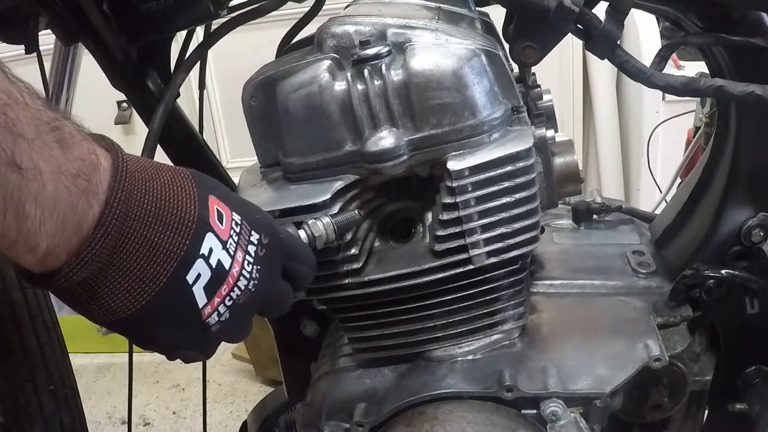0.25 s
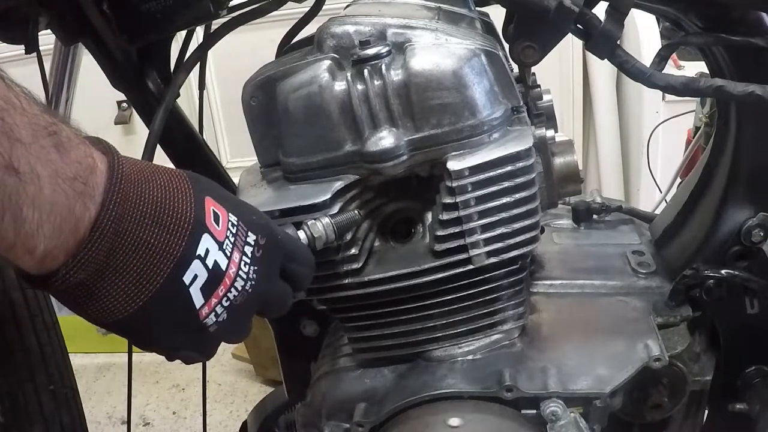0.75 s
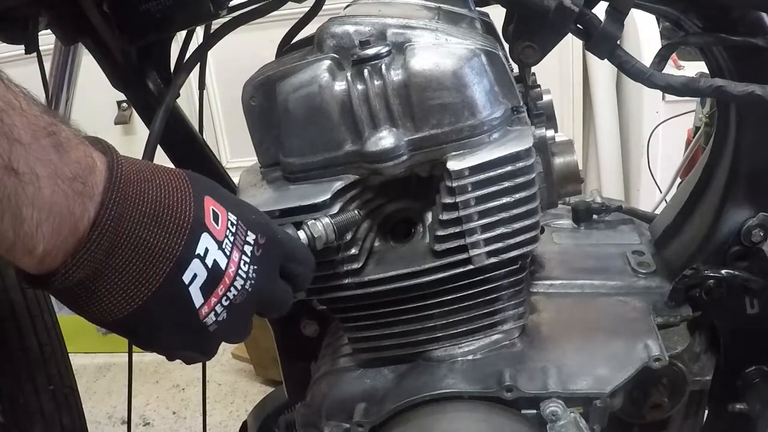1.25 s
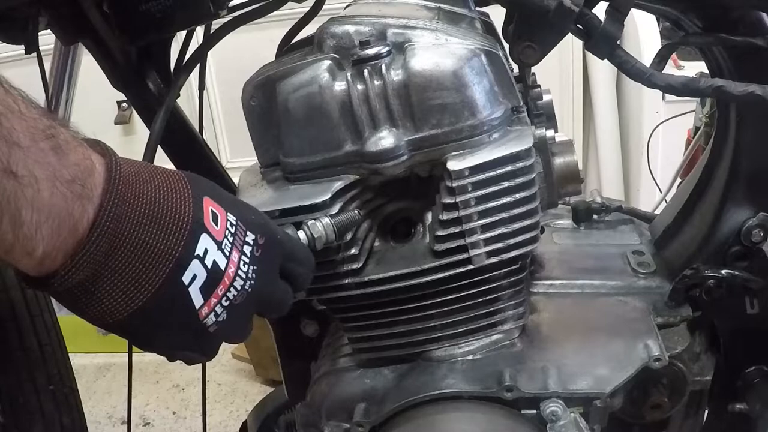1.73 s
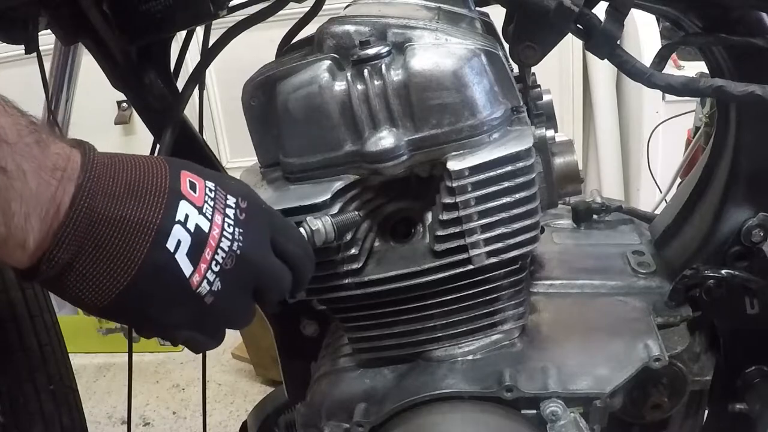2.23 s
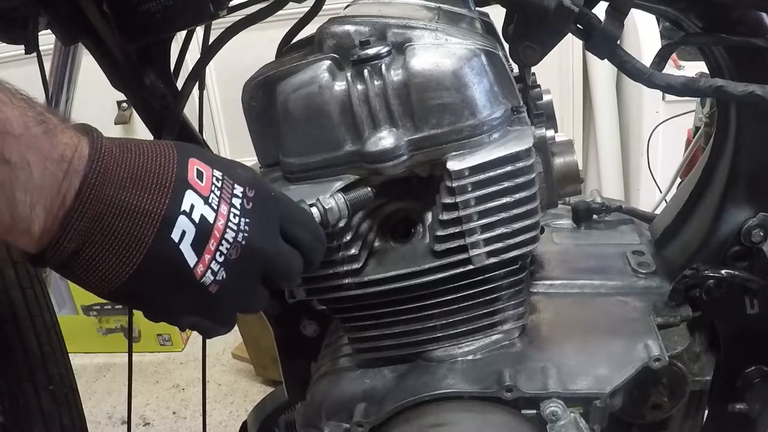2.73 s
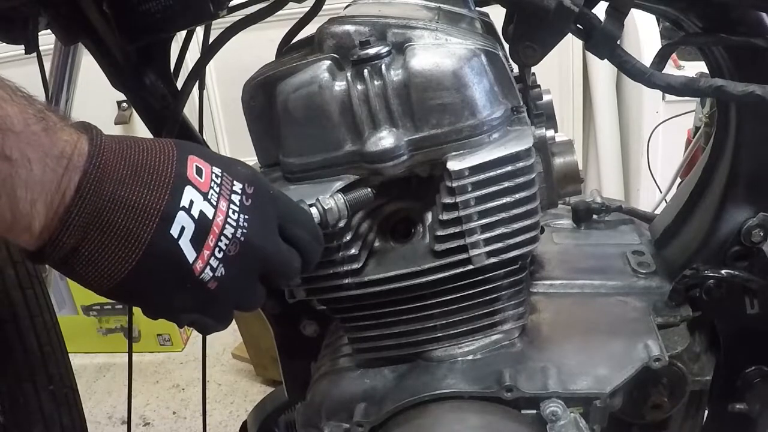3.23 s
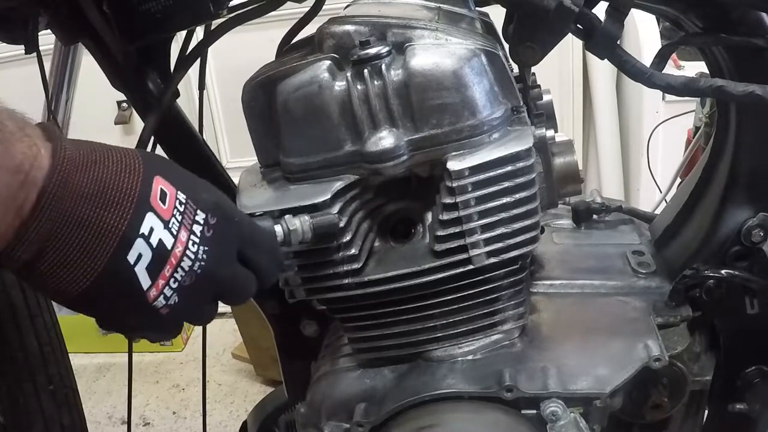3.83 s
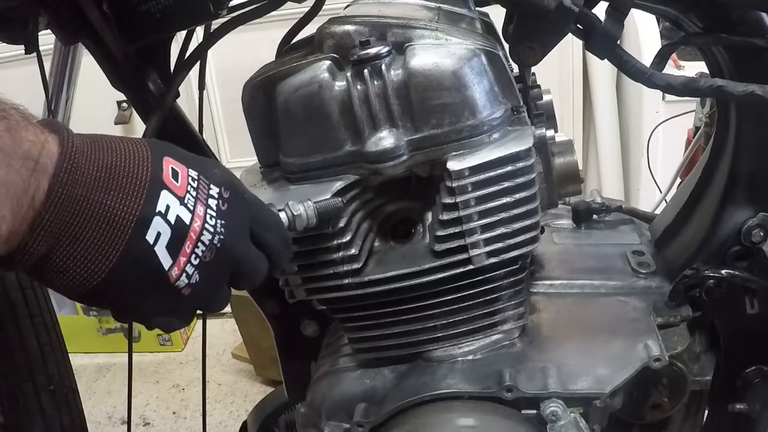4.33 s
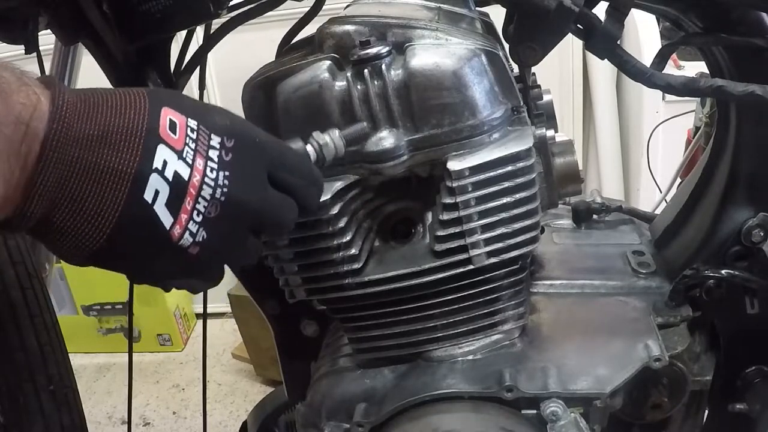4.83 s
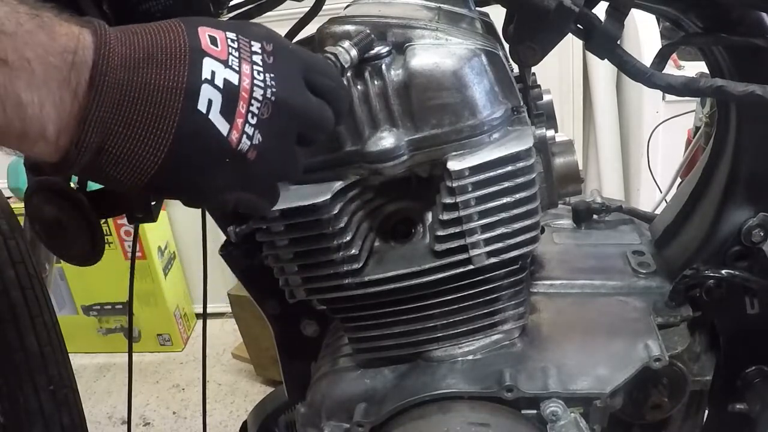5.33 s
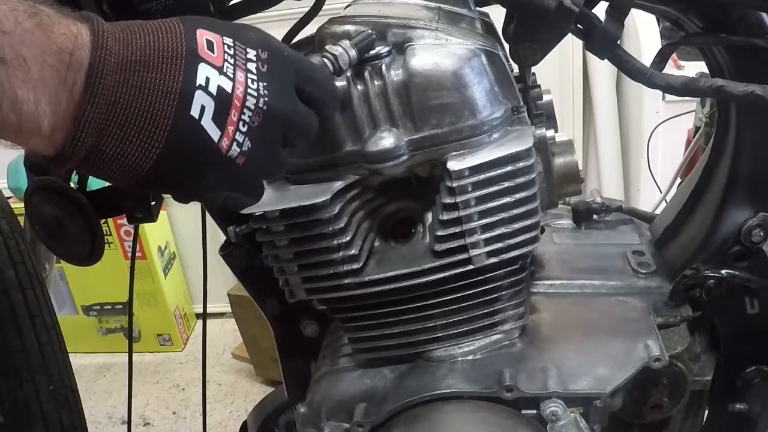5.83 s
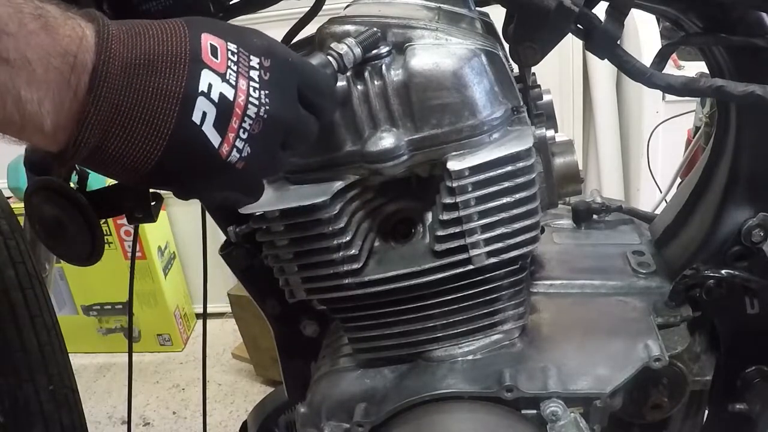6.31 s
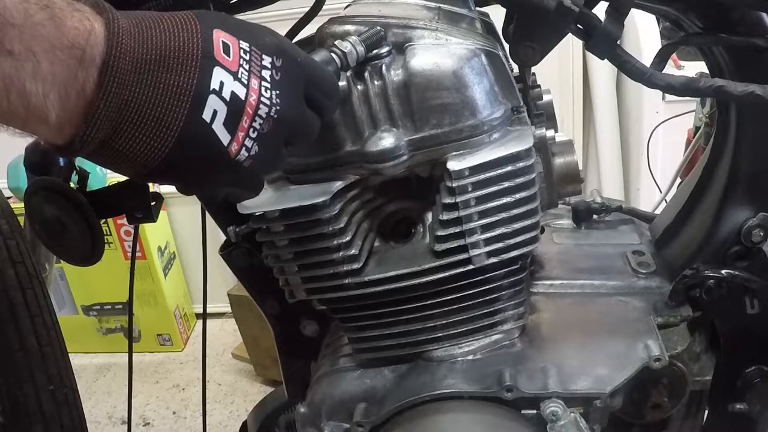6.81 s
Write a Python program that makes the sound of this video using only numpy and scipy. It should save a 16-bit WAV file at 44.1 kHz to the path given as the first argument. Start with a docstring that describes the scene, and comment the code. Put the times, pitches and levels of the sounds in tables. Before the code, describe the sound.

In a garage, a solenoid clacks and an electric starter cranks a twin-cylinder motorcycle engine for about four seconds without firing. The gears whine and grind in pulses, slowing at each piston stroke, over a churning chain and rattling valves. It coasts to rest with a thud, and a plug lead lightly taps the metal. Another clack starts a second try. The sound is close, over a faint low rumble.

```python
"""Over a garage's low rumble a solenoid clacks, and an electric starter cranks a twin-cylinder motorcycle
engine, twice, without firing. The starter gears whine and grind through the cases, slowing at every
piston stroke (one cylinder harder than the other), while the chain churns and the valve train rattles
in the cooling fins. Between the tries the gears thud and coast to rest, and a plug lead taps the head."""
import sys
import numpy as np
from scipy import signal
from scipy.fft import rfft, irfft
from scipy.io import wavfile

SR = 44100
rng = np.random.default_rng(int(sys.argv[2]) if len(sys.argv) > 2 else 0)


def wrap_up_sound(samples):
    """Save the sound to the file named by the first command line argument, as 16-bit audio."""
    columns = np.atleast_2d(samples).T
    # keep every value between -1 and 1, then stretch to whole-number steps
    tamed = np.clip(columns, -1, 1)
    steps = np.round(tamed * 32767).astype(np.int16)
    wavfile.write(sys.argv[1], SR, steps)


N = 311669

# tone of the garage air: (frequency [Hz], level [dB])
AIR_TONE = [(60, -36), (130, -6), (175, -3.5), (245, -7), (370, -14.5), (500, -17.5), (1460, -27.5),
            (3400, -40.5), (4700, -29), (5700, -32.5), (7300, -44), (9700, -36.5), (12000, -51),
            (15500, -54)]
# tone of the low rumble: (frequency [Hz], level [dB])
RUMBLE_TONE = [(12, -1), (28, -0.5), (45, -0.5), (80, -4), (120, -10), (200, -36), (500, -58)]
# fader ride on the rumble: (time [s], level [dB])
RUMBLE_FADER = [(0.0, -39), (1.01, -42.5), (5.07, -39.5), (6.87, -57.5), (6.95, -66)]

# the hand-held plug lead touches the head: (time [s], relative level [dB])
LEAD_HITS = [(5.18, -28.5), (5.2435, -34)]
# tone of a tap: (frequency [Hz], level [dB])
LEAD_TONE = [(600, -5), (2000, -3), (2700, -1), (3600, 0), (4400, 10), (5700, -6), (7000, -21),
             (14000, -26)]
# the solenoid plunger snaps in and seats: (time [s], relative level [dB])
SOLENOID_HITS = [(0.6113, -19), (0.6213, -41), (5.6226, -20), (5.6334, -41), (5.6984, -28)]
# steely ring of the solenoid: (frequency [Hz], level [dB])
SOLENOID_TONE = [(1000, -4), (2800, -1.5), (3600, -22), (4600, 1), (5300, 4), (6200, 4.5), (7400, -8.5),
                 (9000, -12), (11000, -28), (12700, -17), (15500, -27)]
# the gear train takes up its backlash: (time [s], relative level [dB])
BACKLASH_HITS = [(0.623, -28), (4.691, -40), (4.722, -21.5), (5.636, -27.5)]
# tone of that thud: (frequency [Hz], level [dB])
BACKLASH_TONE = [(300, -24), (750, 0), (1100, 8), (1600, 8.5), (2300, -11.5), (5000, -2), (9000, -39)]

# broad tone of the engine as valve train, chain and gears shake it: (frequency [Hz], level [dB])
FIN_TONE = [(1200, -15.5), (2300, -2.5), (2900, -14.5), (3600, -13.5), (4300, -2.5), (5500, -3.5),
            (6300, -7.5), (7100, -15), (8600, -16), (10000, -27), (11200, -36), (12300, -19),
            (13700, -26.5), (15500, -65)]
CHAIN_TONE = [(150, -19), (380, -17), (520, -10.5), (680, -6.5), (860, -3), (1020, 7), (1200, -5.5),
              (2000, -11), (5000, -49.5)]
GEAR_TONE = [(250, -45), (500, -19.5), (780, -29), (1100, -11.5), (1330, -1), (1520, 7), (1680, 3),
             (1950, -7), (2500, -12.5), (3100, -19), (6000, -43)]
# resonances of the crankcase and covers: (frequency [Hz], width [Hz], boost [dB])
CASE_MODES = [(495, 24, 5.5), (612.6, 28.5, 9.5), (634, 38, -3), (758.6, 26, 13.5), (1042.5, 60, -7),
              (1328, 62, 4.5), (1340, 18, 2), (1486, 30, 8), (1560, 25, -2), (1653, 43, 5.5),
              (1713, 170, -11), (1910, 33, 1), (2160, 35, -18)]
# partials of the gear whine: (harmonic [x tooth rate], level [dB])
WHINE_PARTIALS = [(1, -6), (2, -2), (3, -6), (4, -9)]

# the two tries: (on [s], off [s], lead-in to the first heavy stroke [turns], its hardness [0-1])
STARTER_RUNS = [(.62, 4.62, .235, 0), (5.63, 7.1, .401, 1)]
# the starter spins up, coasts to rest and spins up again: (time [s], mean speed [teeth/s])
STARTER_SPEED = [(0.62, 0.0), (0.76, 324.1), (1.17, 677.3), (1.6, 768.6), (2.3, 843.1), (3.2, 847.0),
                 (4.15, 869.0), (4.56, 785.8), (4.63, 578.0), (4.94, 0.0), (5.63, 0.0), (5.75, 385.7),
                 (5.9, 443.2), (6.2, 605.3), (6.45, 654.0), (7.07, 698.4)]
# each layer swells with speed: (mean speed [teeth/s], gears [dB], chain [dB], valve train [dB])
LEVEL_BY_SPEED = [(0, -62, -71, -78), (112, -41.5, -48, -54), (284, -31, -36.5, -48),
                  (385, -28.5, -35, -40), (480, -26.5, -31, -33.5), (640, -24, -29.5, -32.5),
                  (855, -22.5, -27, -31)]
# one crank turn in equal steps from the heavy stroke; the light stroke comes halfway:
# (speed swing [share], whine [dB], grind [dB], chain [dB], valve train [dB])
STROKE_CYCLE = [(0, 8, 5, 1, 0), (-.05, 5, 4.5, -1.5, -2), (-.08, -3.5, -0.5, -0.5, 0.5),
                (-.068, -7.5, -0.5, -2.5, 0.5), (-.03, -7, 1, 0, 2.5), (.03, 3, 3, 1.5, 2),
                (.025, 0, 3.5, 4, 1.5), (-.015, -4.5, 5, 0, 1.5), (-.05, -3, -3.5, -0.5, -0.5),
                (.015, -7, -3.5, -6.5, 1.5), (.065, -4.5, 3.5, 2, 3), (.06, 8, 5.5, 4, 2.5)]
# motor off, the gears go slack, the chain slaps and the valves close softly:
# (gears [dB], chain [dB], valve train [dB])
COAST_TRIM = (-3, 3.5, -6)


def from_db(db):
    """Decibels to gain."""
    return 10 ** (np.asarray(db) / 20)


def automation(rows):
    """A (time, value) curve at every sample."""
    return np.interp(np.arange(N) / SR, *np.transpose(rows))


def unit_power(x):
    """Scale to an RMS of 1."""
    return x / np.sqrt(np.mean(x ** 2) + 1e-20)


def drift(rate_hz):
    """Smooth random wobble of unit power."""
    lowpass = signal.butter(2, rate_hz, fs=SR, output="sos")
    return unit_power(signal.sosfilt(lowpass, rng.standard_normal(N + SR))[SR:])


def through(x, response):
    """Pass a sound through an impulse response."""
    return signal.oaconvolve(x, response)[:N]


def body(tone, modes=(), size=16384):
    """Minimum-phase impulse response of unit energy: a broad tone with narrow resonances on it."""
    hz = np.maximum(np.fft.rfftfreq(size, 1 / SR), 1)
    tone_hz, tone_db = np.transpose(tone)
    level_db = np.interp(np.log(hz), np.log(tone_hz), tone_db)
    for centre, width, db in modes:
        level_db += db / (1 + (2 * (hz - centre) / width) ** 2)
    cepstrum = irfft(np.log(from_db(level_db)))
    response = irfft(np.exp(rfft(2 * cepstrum[:size // 2], size)))
    return response / np.linalg.norm(response)


def reverb(x, t60_s, wet_db):
    """Blend in a dense dying tail, keeping the power."""
    t = np.arange(SR // 2) / SR
    tail = rng.standard_normal(len(t)) * from_db(-60 * t / t60_s) * (1 - np.exp(-t / .002))
    wet = from_db(wet_db)
    return (x + wet * through(x, tail / np.linalg.norm(tail))) / np.sqrt(1 + wet ** 2)


def contacts(per_s, spread_db):
    """Random clicks of uneven strength, at unit power."""
    sizes = from_db(spread_db * np.clip(rng.standard_normal(N), -2, 2)) * rng.choice([-1, 1], N)
    return unit_power(sizes * (rng.random(N) < per_s / SR))


def blows(hits, gain_db, chatter_s):
    """Each blow is a short burst of bounces, played as dying noise."""
    t = np.arange(SR // 20) / SR
    track = np.zeros(N)
    for time_s, level_db in hits:
        start = round(time_s * SR)
        burst = rng.standard_normal(len(t)) * np.exp(-t / chatter_s)
        track[start:start + len(t)] += from_db(level_db + gain_db) * burst / np.linalg.norm(burst)
    return track


def cover(x, pitch_hz=768, t60_s=.3):
    """One engine cover rings on far longer than the rest; gain 1 at its pitch."""
    radius = from_db(-60 / (t60_s * SR))
    feedback = [1, -2 * radius * np.cos(2 * np.pi * pitch_hz / SR), radius ** 2]
    return signal.lfilter((1 - radius ** 2) / 2 * np.array([1, 0, -1]), feedback, x + 1e-18)


def room_tone(air_db=-44):
    """The bed: steady garage air over a low rumble that fades at the end."""
    air = through(rng.standard_normal(N), body(AIR_TONE))
    rumble = through(rng.standard_normal(N), body(RUMBLE_TONE))
    return from_db(air_db) * air + from_db(automation(RUMBLE_FADER)) * rumble


def plug_lead():
    """The lead ticks lightly and drily against the cylinder head."""
    return through(blows(LEAD_HITS, gain_db=14.0, chatter_s=.0059), body(LEAD_TONE))


def backlash(cover_db=32.0):
    """The gears take up their play with a thud that rings the case and the cover."""
    knocks = blows(BACKLASH_HITS, gain_db=21.5, chatter_s=.004)
    return through(knocks, body(BACKLASH_TONE, CASE_MODES)) + from_db(cover_db) * cover(knocks)


def solenoid():
    """The plunger slams home with a bright, steely clack."""
    snaps = blows(SOLENOID_HITS, gain_db=17.5, chatter_s=.0061)
    return reverb(through(snaps, body(SOLENOID_TONE)), t60_s=.18, wet_db=2.5)


def valve_train(tooth_hz, force, full_hz=850):
    """Many small steel contacts keep the cooling fins ringing; slow contacts are duller."""
    ticks = through(force * contacts(per_s=1800, spread_db=2.0), body(FIN_TONE))
    treble = signal.sosfiltfilt(signal.butter(1, 7200, "high", fs=SR, output="sos"), ticks)
    dullness = np.clip(1.27 * (1 - tooth_hz / full_hz), 0, 1)
    return reverb(ticks - dullness * treble, t60_s=.08, wet_db=-10.0)


def chain(tooth_hz, force, churn_db=-2.0, hum_db=-19.5, cover_db=8.0, full_hz=800):
    """Rollers shake the case; their hum grows with speed and wakes the cover as it passes its pitch."""
    phase = 2 * np.pi * np.cumsum(tooth_hz) / SR
    hum = force * tooth_hz / full_hz * np.sin(phase) * (.8 + .8 * drift(70))
    rollers = from_db(churn_db) * force * contacts(per_s=2500, spread_db=1.5)
    churn = through(rollers, body(CHAIN_TONE, CASE_MODES))
    midrange = body([(400, -20), (620, 0), (900, 0), (1300, -20)])
    return churn + from_db(hum_db) * through(hum, midrange) + from_db(cover_db) * cover(hum)


def gears(tooth_hz, pressure, force, whine_db=-17.5, grind_db=-3.0, torque_db=23.0, full_hz=850):
    """Meshing teeth whine under load; each also lands with a small knock that rings the case."""
    pace = tooth_hz / full_hz
    teeth = np.cumsum(tooth_hz * (1 + .004 * drift(90))) / SR
    mesh = sum(from_db(db) * np.sin(2 * np.pi * harmonic * teeth) for harmonic, db in WHINE_PARTIALS)
    # near full speed the pinion bounces and splits the whine into side tones
    bounce = 1 + pace ** 6 * (.7 * np.sin(2 * np.pi * teeth / 7) + .7 * drift(160))
    # a slowed motor pushes harder; a creeping one hardly sings
    effort = from_db(whine_db + torque_db * (1 - pace)) * np.clip((pace - .4) / .18, 0, 1)
    whine = through(effort * pressure * bounce * mesh, body(GEAR_TONE))
    landings = np.diff(np.floor(teeth + .12 * drift(300)), prepend=0) > 0
    knocks = unit_power(landings * rng.uniform(-.93, 1, N))
    grind = through(force * knocks, body(GEAR_TONE, CASE_MODES))
    return whine + from_db(grind_db) * grind


def starter(teeth_per_turn=186.8, full_hz=800, shove_db=2.5, shove_peak_s=.056, release_s=.017):
    """The starter winds the crank round; each stroke swings the tooth rate and the four layer gains."""
    t = np.arange(N) / SR
    mean_hz = automation(STARTER_SPEED)
    turns, hardness, shove, coasting = np.zeros((4, N))
    for on_s, off_s, lead_in, first_hardness in STARTER_RUNS:
        run = t >= on_s
        turns[run] = np.cumsum(mean_hz[run]) / SR / teeth_per_turn - lead_in
        hardness[run] = np.interp(turns[run], [0, .5], [first_hardness, 1])
        age = (t[run] - on_s) / shove_peak_s
        shove[run] = (age * np.exp(1 - age)) ** 2  # from rest the motor leans harder on the gears
        coasting[run] = np.clip((t[run] - off_s) / release_s, 0, 1)
    steps = np.arange(len(STROKE_CYCLE)) / len(STROKE_CYCLE)
    swing, *load_db = [np.interp(turns, steps, curve, period=1) for curve in np.transpose(STROKE_CYCLE)]
    speeds, *levels = np.transpose(LEVEL_BY_SPEED)
    gear_db, chain_db, valve_db = [np.interp(mean_hz, speeds, level) + coasting * trim_db
                                   for level, trim_db in zip(levels, COAST_TRIM)]
    gear_db += shove_db * shove
    gains = from_db(np.array([gear_db, gear_db, chain_db, valve_db]) + hardness * np.array(load_db))
    depth = np.minimum((full_hz / np.maximum(mean_hz, 1)) ** .8, 1.4)  # a slow flywheel swings further
    return mean_hz * (1 + depth * swing), gains


def scene(room_db=-6.5, width_db=-3.0):
    """The engine close up in the garage; only the highest treble has any stereo width."""
    tooth_hz, (pressure, gear_force, chain_force, valve_force) = starter()
    engine = gears(tooth_hz, pressure, gear_force) + chain(tooth_hz, chain_force)
    engine += valve_train(tooth_hz, valve_force)
    engine += solenoid() + backlash() + plug_lead()
    mid = reverb(engine, t60_s=.16, wet_db=room_db) + room_tone()
    sizzle = signal.sosfilt(signal.butter(10, 11500, "high", fs=SR, output="sos"), mid)
    side = from_db(width_db) * sizzle * drift(300)
    return np.array([mid + side, mid - side])


def record(dry, ceiling=.44, cutoff_hz=15300):
    """Soft clipping rounds the peaks, then a steep low-pass trims the top."""
    lowpass = signal.ellip(12, .1, 80, cutoff_hz, fs=SR, output="sos")
    return signal.sosfilt(lowpass, ceiling * np.tanh(dry / ceiling))


dry = scene()
out = record(dry)
wrap_up_sound(out)
```